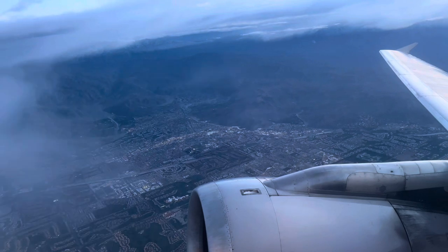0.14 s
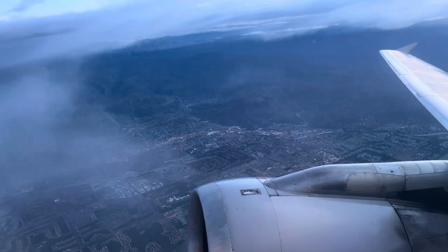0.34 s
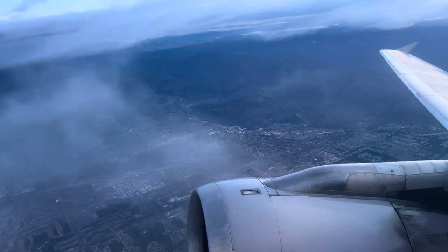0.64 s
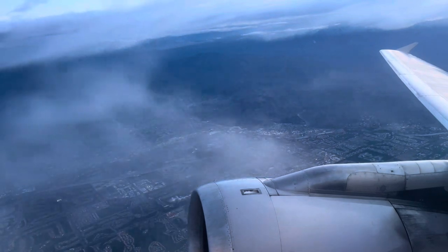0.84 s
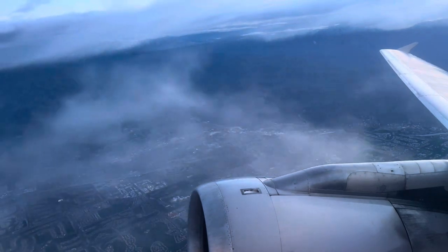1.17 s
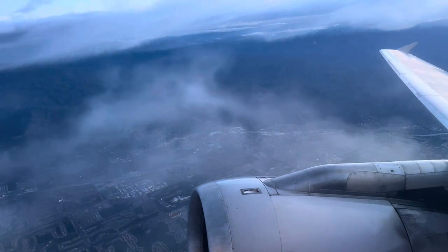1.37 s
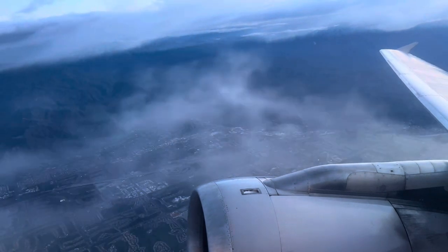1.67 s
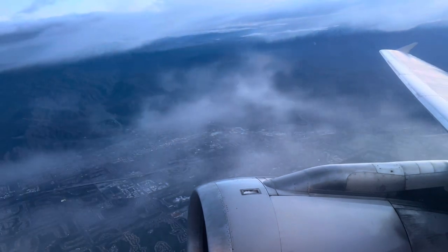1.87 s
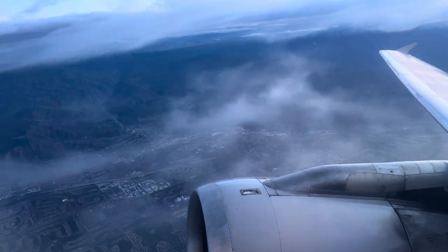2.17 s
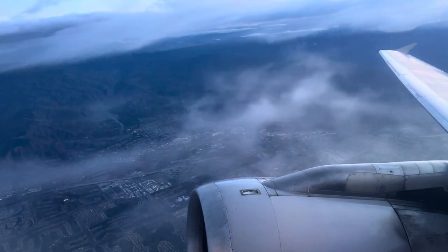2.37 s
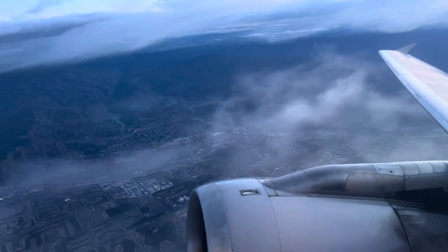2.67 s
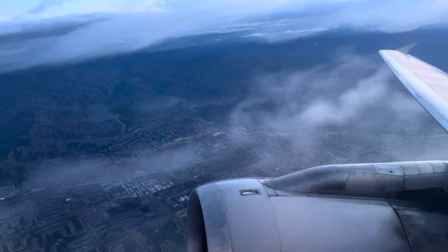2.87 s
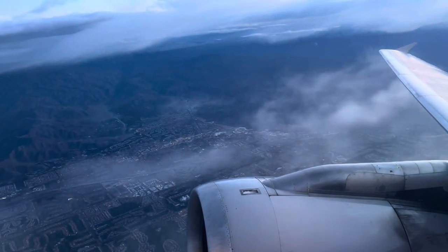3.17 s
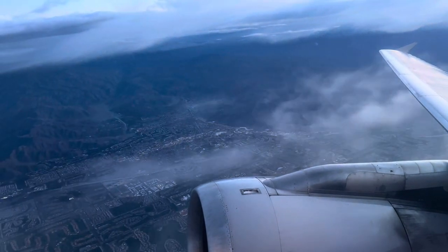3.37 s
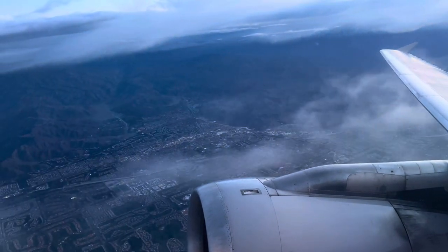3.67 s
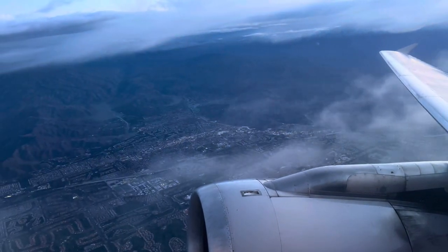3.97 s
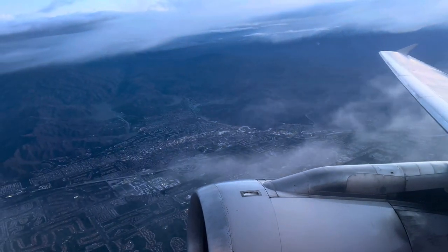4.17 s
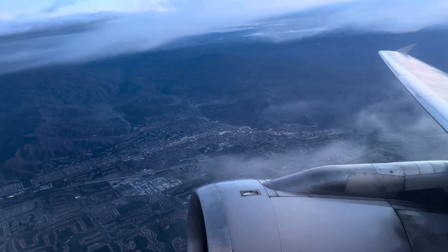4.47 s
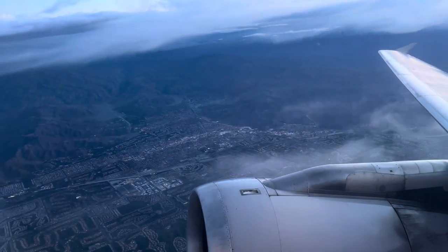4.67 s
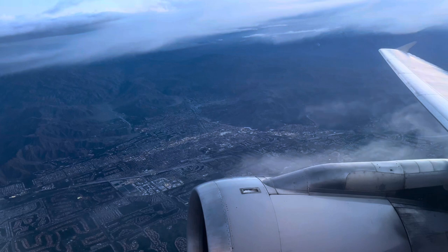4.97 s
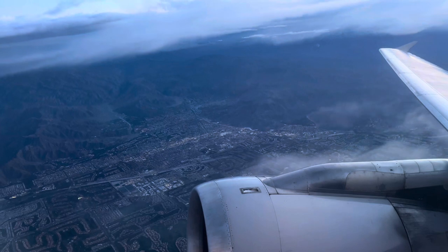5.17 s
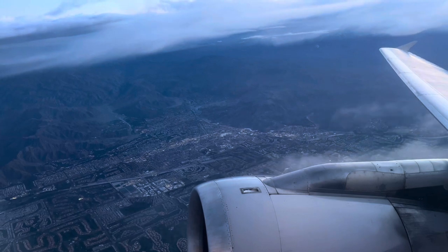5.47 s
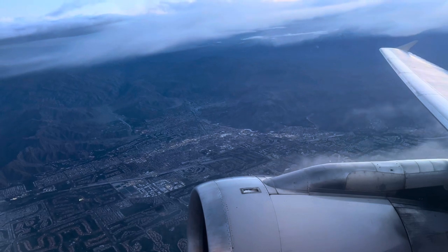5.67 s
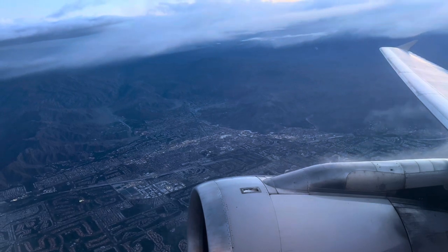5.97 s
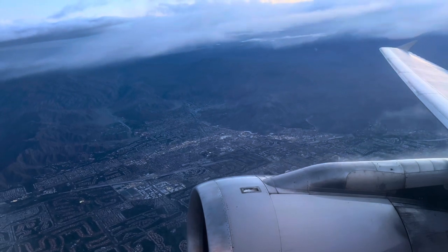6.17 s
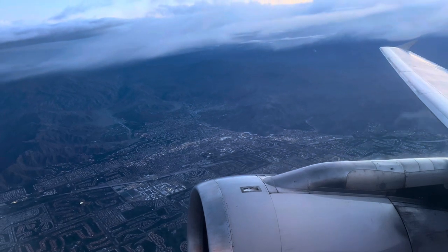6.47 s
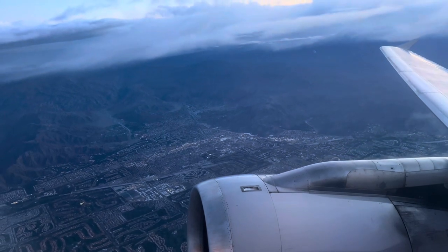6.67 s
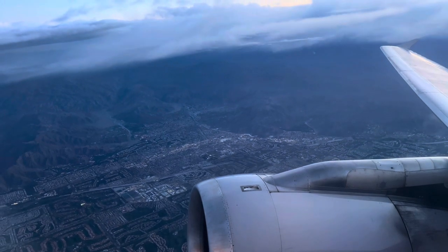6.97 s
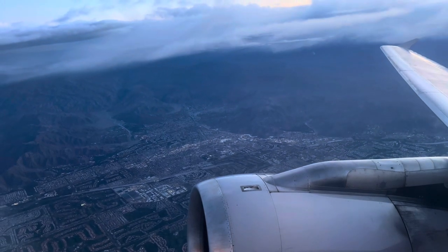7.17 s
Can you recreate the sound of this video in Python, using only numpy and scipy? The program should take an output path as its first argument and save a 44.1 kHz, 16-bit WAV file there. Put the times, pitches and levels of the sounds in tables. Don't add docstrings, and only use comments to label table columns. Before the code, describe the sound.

Steady low jet roar and rushing air inside an airliner cabin, with a wavering fan whine, and a plastic wrapper faintly crackling nearby.

```python
import sys
import numpy as np
from scipy import signal
from scipy.fft import rfft, irfft, next_fast_len
from scipy.io import wavfile
from scipy.ndimage import uniform_filter1d, map_coordinates

SR = 44100
rng = np.random.default_rng(int(sys.argv[2]) if len(sys.argv) > 2 else 0)


def gain_from_db(level_db):
    decades = np.asarray(level_db, float) / 20
    return 10 ** decades


def master_out(mix):
    frames = np.transpose(np.atleast_2d(mix))
    ceiling = np.clip(frames, -1, 1)
    pcm = np.round(ceiling * 32767).astype(np.int16)
    wavfile.write(sys.argv[1], SR, pcm)


N = 323234
REACH = 38000

# pitch_hz, level_db (per Hz), left_over_right_db, right_only_share_db, left_lead_rad
HISS = [(3670, -27, -2.5, 0, 1.5), (4100, -5.5, -1.5, -1, 4.1), (4700, -5.5, 2, -0.3, 5.3),
        (5230, -7, 4, 0, 3.7), (5630, -7, 2, -0.2, 3), (6600, -8, 1, 0, 5.3), (7500, -14, -4, 1.5, 7.8),
        (9380, -16.5, -2.5, -2, 10.4), (9850, -20, 2, -9, 9.42), (10700, -21, 1, -6, 9.42),
        (11400, -21.5, -0.5, -2, 8.3), (12300, -25.5, 0.5, -7, 7.4), (14000, -28, 0, -10, 6.5),
        (15000, -30, 0, -7, 7.3), (15750, -41, 0, -4.5, 9.6)]


def unit(x):
    return x / np.sqrt(np.mean(x ** 2) + 1e-20)


def columns(rows, at, scale=np.asarray):
    key, *cols = np.transpose(rows)
    return [np.interp(scale(at), scale(key), c) for c in cols]


def curves(rows):
    return columns(rows, np.arange(N) / SR)


def by_pitch(rows, hz):
    return columns(rows, hz, np.log1p)


def wobble(rate, step=64):
    knots = rng.standard_normal(int(N / SR * 12) + 8)
    places = np.arange(N // step + 1) * step * rate / SR
    return np.repeat(map_coordinates(knots, [places]), step)[:N]


def ports(pair, hz, table):
    _, tilt_db, own_db, lead = by_pitch(table, hz)
    own = np.minimum(gain_from_db(own_db), 1)
    right = np.sqrt(1 - own ** 2) * np.exp(-1j * lead) * pair[0] + own * pair[1]
    return gain_from_db([tilt_db / 2, -tilt_db / 2]) * [pair[0], right]


def wall_noise(table, patchy_db, ripple_db=0, pane=0):
    z = signal.stft(rng.standard_normal((2, N + SR // 4)), nperseg=512)[2]
    field = uniform_filter1d(rng.standard_normal(z.shape[1:]), size=5, axis=0)
    field = uniform_filter1d(field, size=12, axis=1)
    pair = signal.istft(z * gain_from_db(patchy_db * unit(field)), nperseg=512)[1]
    m = next_fast_len(N + SR // 4)
    hz = np.fft.rfftfreq(m, 1 / SR)
    inside = (hz > table[0][0]) & (hz < table[-1][0])
    standing_db = ripple_db * map_coordinates(rng.standard_normal(600), [hz / 45])
    pane_gap_s, pane_from_hz, pane_full_hz = 1 / 718, 10200, 11500
    share = pane * np.clip((hz - pane_from_hz) / (pane_full_hz - pane_from_hz), 0, 1)
    echo = 1 + share * np.exp(-2j * np.pi * hz * pane_gap_s)
    gain = inside * gain_from_db(by_pitch(table, hz)[0] + standing_db) * echo
    return unit(irfft(gain * ports(rfft(pair, m), hz, table), m)[:, :N])


def airflow():
    # pitch_hz, level_db (per Hz), left_over_right_db, right_only_share_db, left_lead_rad
    rumble_bands = [(24, -32, 0, -12, 0), (33, -23, .1, -16, 0), (42, -9, .4, -21.5, -.06),
                    (62, -1.5, .4, -23, -.08), (95, -4, .2, -18, -.04), (121, -6, .9, -13, -.08),
                    (139, .5, .2, -17.5, -.1), (173, -9, .3, -10.5, 0), (208, -14, 1.2, -6.7, -.06),
                    (230, -11.5, .1, -6.6, -.13), (254, -5, 4.4, -4.1, -.12), (299, -12, 2.4, -6, .35),
                    (347, -14.5, -2.5, -5, .3), (400, -39, -4, -2.5, .87)]
    roar_bands = [(315, -31.5, -1.5, -5.5, 0.2), (370.6, -2.5, -1, -1.5, 0.64), (413, 0.5, -5, -8, 1),
                  (443, -8, -4, -0.5, 1), (525, -9.5, 1.5, -1.5, 2.25), (624, -13, 7, -1.05, 2.9),
                  (673, -14.5, 7, 0, 2.4), (820, -17.5, 6.5, -0.5, 3.9), (910, -19, 1, -1, 5.8),
                  (1100, -19, 2.5, -0.9, 6.1), (1343, -22, -3, -0.4, 6.0), (1406, -27, -2.5, 1.5, 4.5),
                  (1508, -31, -5, -1.5, 5.8), (1660, -63, 1.5, -3.5, 3.4)]
    rush_bands = [(1420, -30.5, -3, -3.5, -0.5), (1580, -8, -2, -5, -2), (1820, -5, -4.5, -6, -1.5),
                  (1980, -7, -1.5, 4, -4), (2330, -7, -1, -1.2, -1.2), (2550, -9.5, -2, 4.5, -0.5),
                  (3200, -11, -3, 3, 2.8), (3200, -17, 0.8, 0, -0.5), (3620, -14, -5.5, -2.5, 2),
                  (3970, -17.5, 0, 2.5, 6), (4530, -48, 0, 0, 7)]
    # time_s, level_db (about its mean)
    slow_swell = [
        (0, -0.5),
        (1.2, 1.05),
        (1.7, -0.65),
        (3.3, 0.3),
        (4.2, 0.2),
        (5, -0.5),
        (6.4, 1),
        (7.33, 0.6),
    ]
    slow_swell_db, = curves(slow_swell)
    climb_db = 0.16 * np.arange(N) / SR
    buffet = wobble(6)
    rumble_db = -17.5 + slow_swell_db
    roar_db = -29 + 0.41 * slow_swell_db + 0.21 * wobble(2.3)
    rush_db = -49.5 + 0.2 * slow_swell_db + climb_db + 0.3 * buffet
    hiss_db = -57.5 + 0.6 * buffet + 0.4 * wobble(9)
    rumble = gain_from_db(rumble_db) * wall_noise(rumble_bands, patchy_db=-0.08)
    roar = gain_from_db(roar_db) * wall_noise(roar_bands, patchy_db=1.07, ripple_db=0.95)
    rush = gain_from_db(rush_db) * wall_noise(rush_bands, patchy_db=0.4, ripple_db=1.5)
    hiss = gain_from_db(hiss_db) * wall_noise(HISS, patchy_db=2.1, pane=0.45)
    return rumble + roar + rush + hiss


def fading():
    # shaft_order, start_s, length_s, change_db
    changes = [(13, 0, .9, 2), (13, 3.3, 2.2, -1.5), (13, 5.8, 1.6, 2), (14, 0, 1, -4), (14, 4.9, 1.1, 3),
               (14, 6.2, 1.2, -4), (15, 4.1, .7, 3), (15, 6.15, 1.3, -5), (17, 6.2, 1.2, -7),
               (20, 0, .75, 9), (20, .95, .6, -7), (20, 3.7, .3, 6), (20, 5.85, 1.6, 9), (29, 4, 1.8, 3),
               (30, 6.5, .9, -8), (32, 5.1, 2.3, -4), (35, 0, 1.4, -8), (35, 4.1, .8, -5), (36, 0, .7, 5),
               (36, 2.5, 1, -7), (36, 6.1, .8, 5), (39, 0, 2.45, 3), (39, 4.35, .7, -7), (39, 5.9, .3, -9),
               (44, 2.55, .6, 4), (44, 3.9, .42, -6), (44, 4.34, .45, 8), (44, 4.85, .8, -5),
               (46, 4.35, .45, 4), (46, .7, .7, -7)]
    edge_s = 0.11
    usual_db = {13: -0.5, 20: -5, 39: -3, 44: -2}
    t, fades = np.arange(N) / SR, {}
    for k, start, length, db in changes:
        k = round(k)
        since = t - start + (start < 0.05)
        left = start + length - t
        on = np.clip(np.minimum(since, left) / edge_s + 0.5, 0, 1)
        fades[k] = fades.get(k, usual_db.get(k, 0)) + db * on
    return fades


def fan():
    # time_s, left_db, left_lead_rad
    blade_tone = [(0.08, -32.1, -2.7), (1.19, -35.3, -2.37), (1.6, -37.3, -2.92), (1.82, -37.9, -3.05),
                  (2.38, -36.8, -2.81), (2.69, -34.9, -2.44), (3.31, -32.5, -2.55), (3.44, -38.6, -2.72),
                  (4.01, -37.6, -3.13), (4.31, -37.2, -2.87), (4.42, -34.4, -2.38), (4.64, -34.4, -2.36),
                  (4.9, -36.1, -2.62), (5.17, -37, -2.8), (5.63, -36, -2.42), (6.06, -31.5, -2.51),
                  (6.49, -31.9, -2.94), (7.24, -32.6, -2.86)]
    # shaft_order, left_db, right_db, left_lead_rad
    shaft = [(1, -24, -29, -0.3), (2, -30.5, -32.5, -0.3), (3, -33, -35, 0), (5, -42.5, -44, 0.8),
             (6, -42, -45, 1.0), (7, -46, -52, 2.9), (8, -48, -70, 3.1), (9, -53, -59, 3.1),
             (10, -54, -62, -2.8), (11, -48, -59, -2.3), (12, -57, -53, -0.2)]
    buzz = [(13, -45.5, -45.5, -.6), (14, -50, -49, .2), (15, -55.5, -46, -.1), (16, -57.5, -52, 2.4),
            (17, -55, -57.5, .6), (18, -62, -62, -1.7), (19, -61.5, -70, 3.2), (20, -56.5, -58.5, -.7),
            (21, -55, -55, 2.8), (23, -64, -63.5, 2.8), (24, -60, -55.5, -3), (25, -62, -64, -.2),
            (26, -64.5, -63, 2.8), (27, -58, -62, 2.5), (28, -65.5, -69, 0), (29, -60.5, -58, .74),
            (30, -55.5, -63, 3.1), (31, -72, -76, -2.5), (32, -59.5, -64, -2.2), (33, -65, -68.5, -.4),
            (34, -69, -65, -.1), (35, -59.5, -59, 2.2), (36, -62, -63.5, 1.3), (37, -72, -70, 1.9),
            (38, -63, -65, 1.6), (39, -61, -59.5, .75), (40, -75, -77, 1.2), (41, -72, -70, .1),
            (42, -69.5, -69.5, 1.1), (43, -74, -71.5, 1.5), (44, -64, -61.5, -1.8),
            (45, -66.5, -69.5, -1.1), (46, -66.5, -65.5, -.7), (47, -75, -76, -1.9), (49, -73, -76, -1.5)]
    blades, blade_hz, creep_hz_per_s = 22, 1773.2, 0.24
    hunt_hz, hunt_s, slowest_s = 0.65, 3.4, 0.6
    t = np.arange(N) / SR
    hunt = hunt_hz * np.cos(2 * np.pi * (t - slowest_s) / hunt_s)
    speed = blade_hz + creep_hz_per_s * t - hunt
    turn = 2 * np.pi * np.cumsum(speed) / blades / SR
    left_db, lead = curves(blade_tone)
    right_db = -36.7 + 0.24 * t
    flutter = 0.04 * wobble(5.8)
    phase = blades * turn + flutter + np.array([lead, 0 * lead])
    out = gain_from_db([left_db, right_db]) * np.sqrt(2) * np.cos(phase)
    fades = fading()
    for orders, drift in ((shaft, 0.12), (buzz, 0.55)):
        for k, left_db, right_db, lead in orders:
            k = round(k)
            angle = k * turn + 0.82 * rng.standard_normal() - lead / 2
            carrier = np.exp(1j * angle)
            wander = 0.14 + k / 220 if k in fades else drift
            for port, db, start in ((0, left_db, lead), (1, right_db, 0)):
                stray = wobble(2 + k / 8) + 1j * wobble(2 + k / 8)
                path = np.exp(1j * start) + wander * stray
                size = gain_from_db(db + fades.get(k, 0)) * np.sqrt(2 / (1 + 2 * wander ** 2))
                out[port] += size * (path * carrier).real
    return out


def pumps():
    # pitch_hz, left_db, right_db, left_lead_rad, wavers_per_s
    tones = [
        (539, -51.5, -51.5, -2.9, 1.5),
        (981.6, -58, -60, -.1, 1.5),
        (2297, -67, -66.5, -.3, 14),
    ]
    t, out = np.arange(N) / SR, np.zeros((2, N))
    for hz, left_db, right_db, lead, rate in tones:
        a, b = [map_coordinates(row, [t * rate]) for row in rng.standard_normal((2, 120))]
        strength = unit((1 + 0.1 * rate) * a + 2)
        tone = strength * np.exp(1j * (2 * np.pi * hz * t + b))
        heard = (tone * np.exp(1j * np.array([[lead], [0]]))).real
        out += gain_from_db([[left_db], [right_db]]) * np.sqrt(2) * heard
    return out


def panel():
    order, pitch_hz, flutter_per_s, level_db = 39, 3143, 30, -62
    t = np.arange(N) / SR
    knots = rng.standard_normal((4, int(N / SR * flutter_per_s) + 4))
    a, b, c, d = [map_coordinates(row, [t * flutter_per_s], order=1) for row in knots]
    shared = a + 1j * b
    apart = 0.5 * (c + 1j * d)
    ring = (np.array([shared + apart, shared - apart]) * np.exp(2j * np.pi * pitch_hz * t)).real
    return gain_from_db(level_db + fading()[order]) * unit(ring)


def cabin_tail():
    # pitch_hz, t60_s
    decay = [
        (1500, 0.17),
        (5000, .115),
        (12000, 0.085),
    ]
    hz, t, z = signal.stft(rng.standard_normal((2, SR // 4)), SR, nperseg=128)
    t60 = by_pitch(decay, hz)[0][:, None]
    tail = signal.istft(z * gain_from_db(-60 * t / t60), SR, nperseg=128)[1]
    return tail / np.linalg.norm(tail[0])


def cabin(sound, colour, direct):
    hz = np.fft.rfftfreq(SR, 1 / SR)
    heard = rfft(sound, SR) * colour(hz) * ports(direct + rfft(cabin_tail(), SR), hz, HISS)
    return irfft(heard, SR)[:, :REACH]


def rustle():
    # start_s, hold_s, level_db, low_part_db, top_part_db
    crumples = [(0.352, 0.02, -54.5, 11.5, -22), (1.052, 0.028, -53.5, 10, -18),
                (1.467, .04, -62, 8.5, -2.5), (2.13, 0.028, -53, 11.5, -15.5),
                (2.628, .006, -53, -11, -28.5), (3.22, .012, -66, 31.5, -19.5),
                (3.249, .014, -48, 11, -21.5), (6.813, .014, -55.5, 6, -9), (6.839, .02, -57.5, 6.5, -14),
                (6.93, .04, -57, 7.5, -15), (6.876, .045, -55, 6.5, -14), (6.995, .07, -53, 4, -13.5),
                (7.081, 0.077, -59.5, 7, -15.5), (7.165, .06, -57.5, 8, -13), (7.24, .05, -59, 7.5, -13)]
    # pitch_hz, level_db (per Hz)
    foil = [
        [(700, -21.5), (1100, 0), (3200, -6), (4200, -32)],
        [(3000, -32), (4000, 2.5), (7000, -3), (9300, -8), (10800, -16), (11500, -38.5)],
        [(10500, -31), (11500, 0.5), (13500, -5), (15000, -5), (15600, -16)],
    ]
    grip_db_per_s, let_go_db_per_s, span_db = 700, 260.5, 24.5
    out = np.zeros((2, N + SR))
    for s, hold, peak_db, low_db, top_db in crumples:
        begin = s - span_db / grip_db_per_s
        end = s + hold + span_db / let_go_db_per_s
        t = np.arange(begin, end, 1 / SR)
        slopes_db = np.minimum(grip_db_per_s * (t - s), let_go_db_per_s * (s + hold - t))
        db = peak_db + np.minimum(0, slopes_db)
        clumps = map_coordinates(rng.standard_normal(80), [(t - t[0]) * 90])
        sparks = rng.standard_normal((2, SR))[:, :len(t)]
        grains = unit(sparks[0] * gain_from_db(4.6 * sparks[1] + 3 * clumps))
        for part, part_db in zip(foil, (low_db - 9, -1.5, top_db)):
            heard = cabin(grains * gain_from_db(db + part_db), lambda hz: unit(gain_from_db(by_pitch(part, hz)[0])), direct=1.23)
            out[:, round(t[0] * SR):][:, :REACH] += 0.8 * heard
    return out[:, :N]


def snaps():
    # start_s, peak_db, low_part_db, bright_part_db, crackle_ms
    creases = [(0.73, -43, 7, -26, 5.5), (1.6682, -47.5, -4, -6, 3), (1.6722, -28.5, 3.5, -3.5, 3.7),
               (1.6805, -35.5, 5.5, -5, 4.5), (1.747, -35.5, -13, -6.5, 4), (1.7527, -35.5, -14, -10, 5),
               (2.6335, -31.5, -13.5, 5, 4), (2.6737, -30, -7, -14, 7), (3.24, -40, 5, -13, 12),
               (4.124, -53, 4.5, -14, 4), (4.47, -57.5, 10, -4.5, 4), (4.549, -53.5, 13, -5, 4),
               (5.0778, -42.5, 2.5, -13, 6), (6.882, -44.5, -0.5, -11.5, 5), (6.891, -42.5, 0.5, -14, 5),
               (7.1905, -39.5, -1, -14.5, 4.5)]
    out, t = np.zeros((2, N + SR)), np.arange(SR // 10) / SR
    for s, db, low_db, bright_db, ms in creases:
        top_db = 1.6 * bright_db - 12 - 0.3 * (db + 28.5)
        hollow_db = -2 * np.clip(low_db, 0, 4)
        sparks = rng.standard_normal(len(t)) * gain_from_db(2.5 * rng.standard_normal(len(t)))
        burst = sparks * np.exp(-(t / (ms / 1000)) ** 2)
        fold = [(800, low_db - 15.5), (1200, low_db - 3.0), (3300, low_db + 2.0),
                (4200, min(low_db / 2, 0)), (5100, 0), (6200, hollow_db),
                (7300, bright_db), (8800, bright_db), (10400, bright_db - 16),
                (11600, top_db - 3), (12800, top_db), (15300, top_db - 1.5), (15900, top_db - 20.5)]
        heard = cabin(burst / np.linalg.norm(burst), lambda hz: gain_from_db(by_pitch(fold, hz)[0]), direct=0.75)
        out[:, round(s * SR):][:, :REACH] += gain_from_db(db + 27.5) * heard
    return out[:, :N]


def scene():
    return airflow() + fan() + pumps() + panel() + rustle() + snaps()


def band_limit(x):
    return signal.sosfilt(signal.butter(12, 15690, fs=SR, output="sos"), x)


def record(dry):
    soft = dry / (1 + np.abs(dry / 1.1) ** 3) ** (1 / 3)
    return band_limit(soft)


dry = scene()
out = record(dry)
master_out(out)
```